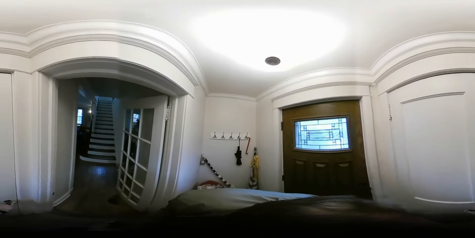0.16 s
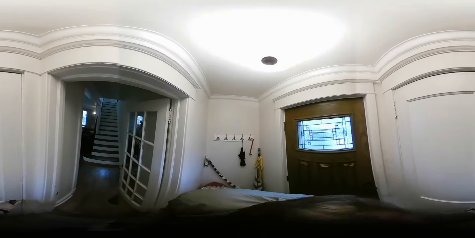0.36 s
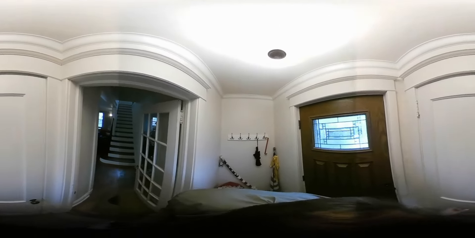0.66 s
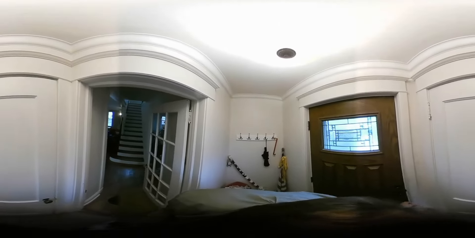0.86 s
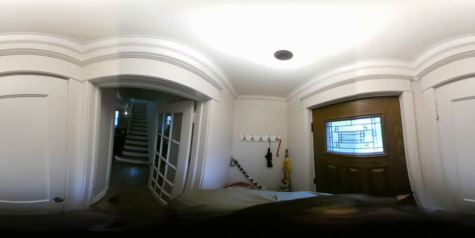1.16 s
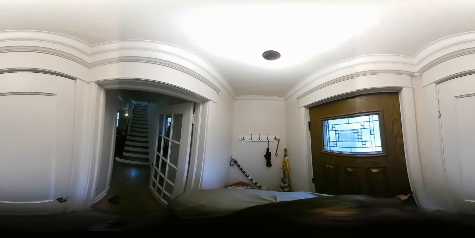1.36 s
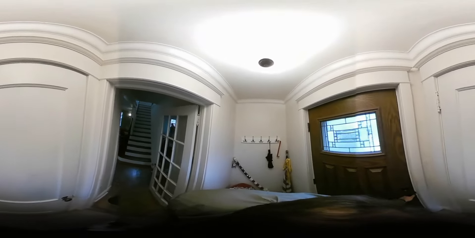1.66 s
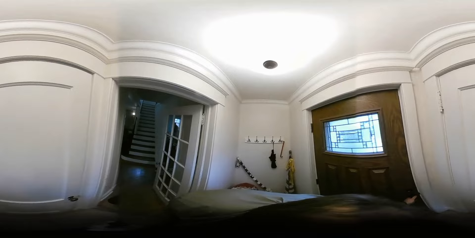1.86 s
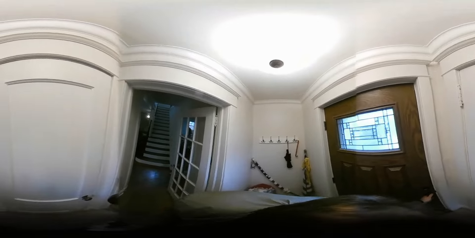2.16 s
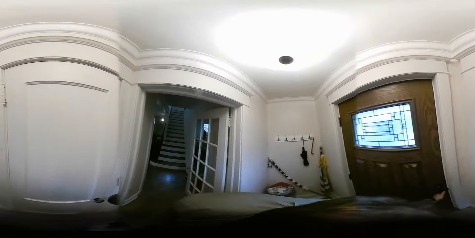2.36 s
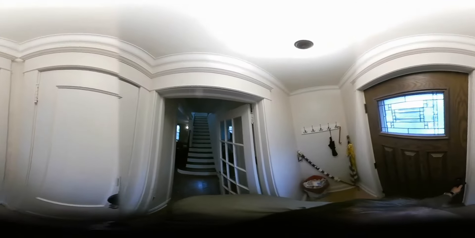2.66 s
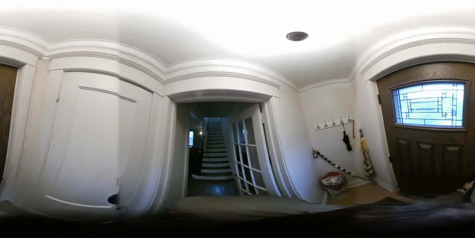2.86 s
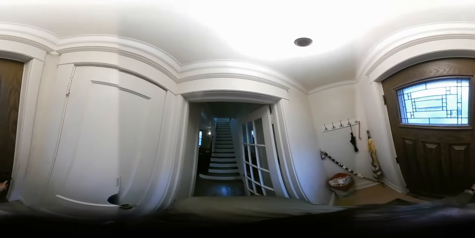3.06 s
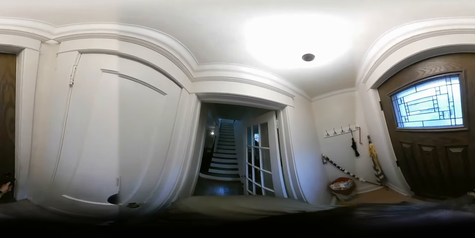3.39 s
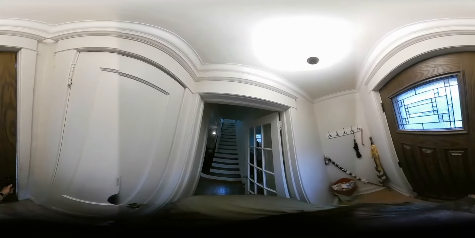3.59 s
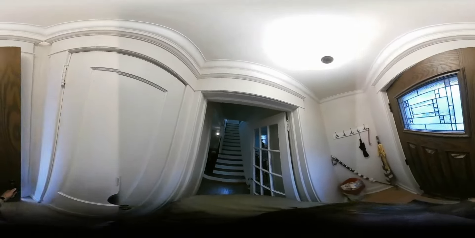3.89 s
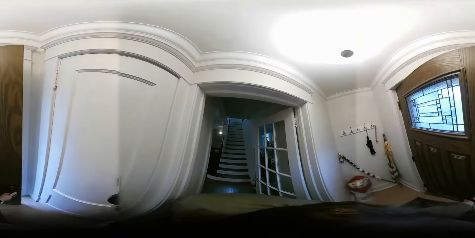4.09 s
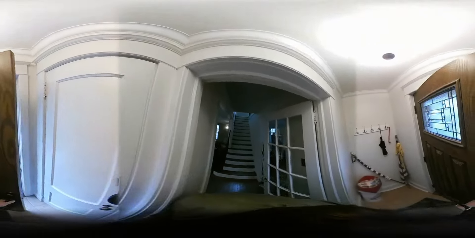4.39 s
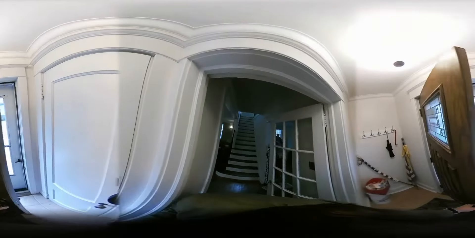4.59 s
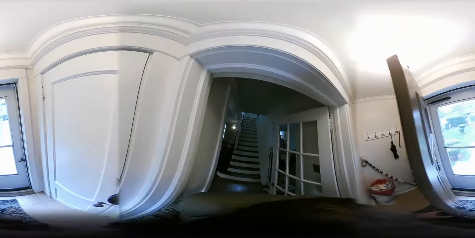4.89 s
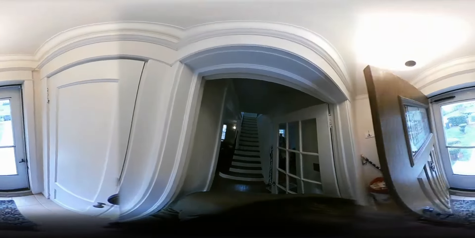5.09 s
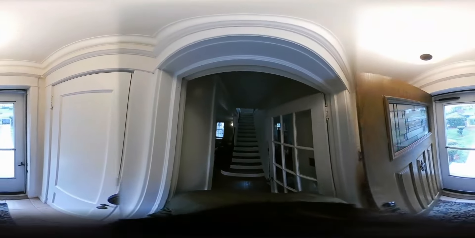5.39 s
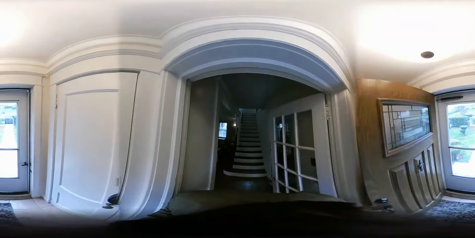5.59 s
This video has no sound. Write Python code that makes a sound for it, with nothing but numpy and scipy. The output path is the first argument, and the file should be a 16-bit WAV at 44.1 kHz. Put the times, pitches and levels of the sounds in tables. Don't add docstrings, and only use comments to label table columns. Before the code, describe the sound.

Booming inner-door slam, short rubber squeak and hollow wooden footsteps, then latch clicks and a front door jerking free of its seal with a woody groan.

```python
import sys
import numpy as np
from scipy import signal
from scipy.fft import rfft, irfft, next_fast_len
from scipy.io import wavfile
from scipy.ndimage import uniform_filter1d, map_coordinates

SR = 44100
rng = np.random.default_rng(int(sys.argv[2]) if len(sys.argv) > 2 else 0)


def master_out(mix):
    frames = np.transpose(np.atleast_2d(mix))
    ceiling = np.clip(frames, -1, 1)
    pcm = np.round(ceiling * 32767).astype(np.int16)
    wavfile.write(sys.argv[1], SR, pcm)


def voltage_ratio(level):
    return 10 ** (np.asarray(level, float) / 20)


N = 253134

# f/Hz, level/dB, time to fall 60 dB/s,
# build-up/s
SLAM_NOTES = [(48, -19, 0.46, 0.011), (74.521, -6.5, 0.6188, 0.066), (83.854, -13.5, 0.55, 0.11),
              (91, -7, 0.42, .06), (100, -10, 0.32, 0.0051), (106.3, -12.5, 0.14, 0.0051),
              (114.6, -6.5, 0.38, 0.007), (128.98, -5, 0.34, 0.0077), (135.47, -14.5, 0.37, 0.0039),
              (161.52, -20, 0.35, .003), (248.15, -23, 0.45, .01), (286.27, -18, 0.35, 0.012),
          (311.06, -12, 0.3953, .006), (368.85, -13.5, 0.3, 0.011), (463.95, -19.5, 0.29, .003),
          (516, -17, 0.28, 0.0018), (566.06, -29, 0.4, 0.003), (636.76, -28.5, .35, .003),
          (705, -25.5, 0.23, 0.0016), (787.83, -27, 0.4, 0.0024), (930.18, -31, 0.32, .003)]
# f/Hz, level per Hz/dB
CRASH = [(120, -30.5), (200, -10), (386, -9.5), (841, -16), (917, -18), (1130, -25), (4430, -42.5),
         (12500, -67.5), (16200, -99), (22000, -120)]
# f/Hz, level per Hz/dB
QUIET = [(15, -41.5), (25, -6), (123, -8), (183, -28.5), (400, -20), (507, -14), (1110, -21), (1370, -20),
         (3610, -29), (4560, -33), (7700, -37.5), (10800, -29.5), (13000, -36)]

# peak t/s, level/dB, rise per 20 dB/s, fall per 20 dB/s, crispness/dB
RUBS = [(0.029, -46, .1, 0.2863, -1.5), (0.429, -52.5, 0.073, 0.4587, -1), (1.83, -59.5, 0.01999, 0.155, 7),
        (1.97, -62, 0.0307, 0.2347, 2.5), (2.42, -67, 0.181, .5, 2), (2.539, -60.5, 0.01636, -0.8278, -14),
        (2.78, -51, 0.1445, 0.2372, 3), (2.973, -61, 0.04343, 0.2675, 0),
        (3.195, -60.5, 0.0061, 0.1491, 5.5), (3.292, -66.5, 0.0338, 0.5, -12),
        (3.424, -74.5, 0.089, 1.43, -24.5), (3.506, -58, 0.02778, .5, 7.5), (3.62, -57, 0.2258, 0.214, 1.5),
        (3.704, -52, 0.072, 0.2655, 4), (4.037, -37.5, 0.1129, 0.0675, -10),
        (4.081, -44.5, 0.10556, 0.2109, -2), (4.25, -61, 0.1638, 0.0158, -15.5),
        (4.429, -53.5, 0.1759, 0.1418, -6), (4.52, -52.5, 0.08228, 0.258, -7.5),
        (4.913, -54.5, 0.23356, .5, -4), (5.261, -63.5, 0.1344, 0.0986, -11),
        (5.45, -68, 0.659, 2.5, -30.5), (5.73, -63.5, 0.2183, -1, -1)]
# f/Hz, level per Hz/dB
RUB_BODY = [(250, -15), (350, -6), (600, 0), (900, -6.5), (1300, -8), (1800, -15)]
RUB_RUSTLE = [(590, -33.5), (1000, -4), (1090, -3.5), (2460, -2.5), (2770, -6), (6000, -18.5),
              (7800, -38.5), (13200, -120)]
RUB_FIZZ = [(2650, 4), (4500, 0), (6090, 2), (7170, -4), (8600, -6), (13000, -13)]

# t/s, peak level/dB, weight/dB, hardness/dB
SLAPS = [
    (.092, -27, 6, -11),
    (.4345, -45.5, -5.5, 1.5),
    (1.6225, -41.5, -5, -37.5),
    (1.782, -45, -2.5, -23),
    (1.808, -47, -2.5, -2),
    (1.8155, -31, -12, -8),
    (1.922, -44, -1.5, -10),
    (1.944, -37, -4, -1),
]
# t/s, peak level/dB, weight/dB, hardness/dB
STEPS = [(0.238, -39, 6, -6), (0.711, -37.5, -9, -5), (0.764, -41, -7.5, -11.5), (0.962, -56, -2, -22),
         (1.295, -43, -5.5, -10), (1.3065, -39, -13.5, -11), (1.461, -60.5, 11.5, -26),
         (1.849, -39.5, -2, -8), (2.232, -62, -15, 1), (2.401, -52.5, -2, -14.5), (2.535, -54, 2, -24),
         (2.974, -47.5, 6.5, -8.5), (3.057, -54.5, 8, -5.5)]
# t/s, peak level/dB, weight/dB, hardness/dB
LOCK = [
    (3.119, -49, -7, -1),
    (3.123, -32, 3, -12),
    (3.188, -50, 15, 1.5),
    (3.401, -55, 4.5, -16.5),
    (3.934, -37.5, 7.5, -18.5),
    (4.009, -45, 2.5, -2.5),
    (4.033, -43, -3, -13.5),
    (4.406, -53, 20.5, 1.5),
    (4.492, -39.5, -30.5, -29.5),
    (4.834, -43, -26.5, -30.5),
]
# f/Hz, width/Hz, level/dB
BOARDS = [(508.17, 24, 0), (780, 120, -27)]

# t/s, level/dB, f/Hz, time to fall 60 dB/s, build-up/s
HOLLOWS = [(.24, -35, 308, 0.2776, 0.01483), (0.782, -45.5, 208.1, 0.3296, 0.04275),
           (1.311, -37.5, 305.3, 0.14554, 0.01393), (1.456, -42.5, 309.3, 0.13134, 0.00582),
           (1.831, -36.5, 301.3, 0.4353, 0.01986), (2.533, -46, 420.3, 0.1152, 0.003924),
           (2.78, -47.5, 419.6, 0.1372, 0.00524), (3.126, -38.5, 153.4, 0.1978, 0.00631),
           (3.1263, -26, 261.1, 0.03182, 0.001068), (0.457, -48, 241.2, 0.3676, 0.023),
           (3.937, -33.5, 139.3, 0.66, 0.002455), (3.988, -29.5, 215.2, 0.37234, 0.0099),
           (4.33, -38.5, 150.2, 0.7183, 0.06554), (.79, -41, 100, 0.3233, 0.00895),
           (2.954, -48, 278.3, 0.1282, 0.00485), (5.25, -53.5, 261.4, 0.3282, 0.02067)]
# t/s, level/dB, f/Hz, time to fall 60 dB/s, build-up/s
JERKS = [
    (3.9605, -31.5, 150.2, 0.0404, 0.002146),
    (3.998, -24.5, 190, 0.0405, 0.002275),
    (4.027, -19, 520, .07, 0.008735),
    (4.024, -29, 762.2, 0.09755, 0.003085),
    (4.036, -40.5, 870.9, 0.0501, 0.003676),
    (4.05, -25, 519.3, .1, .001),
    (4.047, -27.5, 644.9, 0.0895, 0.002436),
    (4.13, -30, 38.89, 0.2963, 0.006145),
    (4.165, -47, 618, 0.2779, 0.01149),
    (4.185, -38, 305.1, 0.1338, 0.00814),
]
# t/s, peak level/dB, f/Hz, time to fall 60 dB/s, left over right/dB
TICKS = [(0.4357, -46, 4747, 0.04794, 7.5), (0.7127, -47, 6034, 0.013, 11),
         (.7124, -54.5, 8167, 0.017, 15.5), (1.8155, -48, 7521, 0.0265, 18),
         (1.8154, -42, 9822, 0.0047, 17.5), (1.82, -32, 3668, 0.02, 10), (1.9453, -37, 3064, 0.16116, 15.5),
         (1.9455, -40.5, 5381, 0.017, 14.5), (3.1225, -35, 1929, 0.018, 9), (3.2, -50, 6500, 0.06, 14),
         (3.1899, -34.5, 4984, 0.00882, 22), (3.196, -46.5, 3224, 0.045, 12),
         (3.1884, -52.5, 2352, 0.032, 10.5), (3.506, -48, 10170, 0.01478, 14.5),
         (3.554, -49, 10100, 0.015, 19), (3.935, -41.5, 1414, 0.061, 16),
         (4.0115, -39.5, 2517, 0.0387, 12.5), (4.038, -42, 2796, 0.03487, 8.5),
         (4.072, -46, 6046, 0.0624, 14.5), (1.947, -38, 1901, 0.06, 12), (1.307, -56.5, 5342, 0.16, 10.5),
         (1.316, -53.5, 3514, 0.1592, 7), (1.306, -43, 1850, .08, 7.5), (1.6248, -57, 2081, 0.0393, 3.5),
         (1.821, -47.5, 5070, 0.11, 11), (1.825, -44, 2400, 0.14, 7.5), (1.95, -46.5, 6535, 0.093, 9),
         (1.95, -44, 4293, 0.15, 8.5), (3.126, -59, 5863, 0.0788, 11), (3.192, -51.5, 8025, 0.02915, 14.5),
         (3.2, -48, 4300, .1, 12), (1.814, -44, 5500, .03, 10), (1.818, -40, 3100, .1, 8),
         (4.834, -48, 900, .05, 4), (3.935, -46, 3600, .02, 10), (4.082, -48, 8800, .04, 14),
         (3.402, -56, 800, 0.04336, 3)]

# t/s, slip rate f/Hz, level/dB
SQUEAK = [
    (.437, 1062, -56),
    (.445, 1062, -31),
    (.465, 1067, -28),
    (.477, 1069, -21.5),
    (.497, 1086, -25),
    (.507, 1098, -34),
    (.535, 1095, -36),
    (.548, 1090, -48),
    (.69, 1085, -65),
]
# t/s, slip rate f/Hz, level/dB
SKIP = [
    (0.548, 1075, -55),
    (0.559, 1060, -39),
    (0.578, 1005, -44),
    (0.6, 1010, -52),
    (0.625, 980, -62),
]
# t/s, slip rate f/Hz, level/dB
CHIRP = [
    (.565, 1350, -62),
    (.598, 1358, -45),
    (.62, 1355, -56),
    (.64, 1350, -59),
    (.69, 1370, -70),
]
# multiple of the slip rate, level/dB
SOLE = [(1, 0), (2, -19), (3, -22), (4, -34), (5, -42), (6, -43)]
# from t/s, to t/s, level/dB, rise per 20 dB/s, fall per 20 dB/s
OVERTONES = (.465, .535, -27.5, .05, .06)
# from t/s, to t/s, level/dB, rise per 20 dB/s, fall per 20 dB/s
ALTERNATE = (.492, .535, -47, .015, .09)

# peak t/s, rumble level/dB, fall per 20 dB/s, sway over rumble/dB
BUMPS = [(.45, -51, 0.1854, -2), (.77, -47, 0.0008, -16.5), (.87, -63, 0.483, 9),
         (1.35, -60.5, 0.1265, -4.5), (1.87, -47, 0.1427, -1.5), (1.95, -60.5, 0.2488, 4),
         (2.44, -57.5, 0.2839, -10.5), (2.56, -69, 0.0503, -7), (2.851, -57, 0.0951, -6.5),
         (2.97, -56.5, 0.2899, 0), (3.14, -50, 0.1502, -7), (3.64, -47, 0.3045, -0.5),
         (3.72, -46, 0.2077, -7.5), (3.83, -49, 0.0329, -0.5), (3.961, -54.5, 0.1901, -16.5),
         (4.0, -39.5, 0.1814, -3), (4.121, -39.5, 0.2171, -4.5), (4.4, -50.5, 0.1947, 4.5),
         (4.55, -52, 0.1259, -1), (4.91, -55, 0.4043, -5), (5.12, -59.5, 0.7837, -4.5),
         (5.62, -64.5, 0.4861, -6.5)]
# f/Hz, level per Hz/dB
SWAY = [(12, -7.5), (25, 7), (55, -1.5), (80, -34)]
RUMBLE = [(50, -16), (80, 3.5), (130, 2.5), (200, -5.5), (320, -5.5), (420, -21.5)]
# t/s, f/Hz, level/dB
WHISTLE = [
    (3.66, 8210, -73),
    (3.696, 8350, -57.5),
    (3.708, 8300, -44.5),
    (3.792, 8070, -70.5),
    (3.8, 8018, -73),
]

# f/Hz, likeness (1 = the same)
ALIKE = [(25, .985), (60, 0.998), (130, 0.995), (280, 0.93), (590, 0.64), (1270, 0.15), (2730, -0.06),
         (12600, -0.01)]
# f/Hz, share of the left-right level difference
SHADOW = [(500, 0.5), (1200, 0.5381), (3800, 1), (12000, 3)]
# f/Hz, time to fall 60 dB/s
HALL = [(150, 0.44), (600, 0.35031), (2500, 0.33953), (10000, 0.023)]


def unit(x):
    return x / np.sqrt(np.mean(x ** 2) + 1e-20)


def along(points, hz):
    f, value = np.transpose(points)
    return np.interp(np.log(hz + 1), np.log(f + 1), value)


def curves(rows):
    seconds, *columns = np.transpose(rows)
    t = np.arange(N) / SR
    gate = np.clip(np.minimum(t - seconds[0], seconds[-1] - t) / .02 + .5, 0, 1)
    return [np.interp(t, seconds, column) for column in columns] + [gate]


def swell(start_s, end_s, db, rise_s, fall_s):
    t = np.arange(N) / SR
    before = (start_s - t) / np.abs(rise_s)
    after = (t - end_s) / np.abs(fall_s)
    return db - 20 * np.maximum(0, np.maximum(before, after))


def wobble(rate, size=N):
    knots = rng.standard_normal(int(size * rate / SR) + 4)
    return map_coordinates(knots, [np.arange(size) * rate / SR])


def filtered(x, response):
    m = next_fast_len(x.shape[-1] + 8192)
    return irfft(rfft(x, m) * response(np.fft.rfftfreq(m, 1 / SR)), m)[..., :x.shape[-1]]


def panned(db):
    return voltage_ratio(np.array([db / 2, -db / 2]))


def spaced(pair, gain, pan_db):
    lead_s = .0001
    size = pair.shape[1]
    m = next_fast_len(size + 4096)
    hz = np.fft.rfftfreq(m, 1 / SR)
    turn = np.arccos(np.clip(along(ALIKE, hz), -1, 1)) / 2
    mid, side = rfft(pair, m) * gain(hz) * [np.cos(turn), np.sin(turn)]
    shading = panned(pan_db * along(SHADOW, hz))
    lead = np.exp(1j * np.pi * lead_s * np.outer([1, -1], hz))
    return irfft(np.array([mid + side, mid - side]) * shading * lead, m)[:, :size]


def patchy(seconds, patch_db, t60=np.inf):
    noise = rng.standard_normal((2, int(seconds * SR) + 1))
    hz, t, z = signal.stft(noise, SR, nperseg=256)
    patches = uniform_filter1d(rng.standard_normal(z.shape[1:]), size=4, axis=0)
    patches = unit(uniform_filter1d(patches, size=9, axis=1))
    fading_db = -60 * t / (t60 * along(HALL, hz))[:, None]
    out = signal.istft(z * voltage_ratio(patch_db * patches + fading_db), SR, nperseg=256)[1]
    return out[:, :int(seconds * SR)]


def dying(seconds, stretch):
    return patchy(seconds, 2.2, stretch)


def rush(spectrum, grain_db, rate, patch_db, pan_db=0):
    if patch_db:
        pair = patchy(N / SR + .01, patch_db)[:, :N]
    else:
        pair = rng.standard_normal((2, N))
    points = [(7.3, -120)] + list(spectrum) + [(SR / 2, -120)]
    grains = voltage_ratio(grain_db * wobble(rate))
    return unit(spaced(pair * grains, lambda hz: voltage_ratio(along(points, hz)), pan_db))


def ring(t, hz, db, t60, rise_s):
    return voltage_ratio(db - 60 * t / t60) * (1 - np.exp(-t / rise_s)), 2 * np.pi * hz * t


def slam():
    t = np.arange(SR) / SR
    panels = np.zeros((2, SR))
    for hz, db, t60, rise_s in SLAM_NOTES:
        size, turns = ring(t, hz, db, t60, rise_s)
        scatter = 2 * np.pi * rng.random() * (hz > 200)
        quarter_turn = np.pi / 2 * rng.choice([-1, 1]) * np.array([[0], [1]])
        panels -= size * np.sin(turns + scatter + quarter_turn)
    crash = spaced(dying(1, stretch=1.1), lambda hz: voltage_ratio(along(CRASH, hz)), pan_db=8.0)
    crash *= voltage_ratio(-20.5) / np.std(crash[:, :SR // 20])
    both = (spaced(panels, np.ones_like, 0) + crash) * np.clip(t / .002, 0, 1)
    return np.pad(both, ((0, 0), (0, N - SR)))


def quiet_house():
    return voltage_ratio(-65.5) * rush(QUIET, 0.85, 11, 0, pan_db=3)


def rubbing():
    body = rush(RUB_BODY, 1.6, 65, 0.79)
    rustle = rush(RUB_RUSTLE, 0.66, 250, 3.0)
    fizz = rush(RUB_FIZZ, 0.5, 400, 2.9)
    strokes = voltage_ratio([swell(s, s, db, rise_s, fall_s) for s, db, rise_s, fall_s, _ in RUBS])
    crisp_db = np.array(RUBS)[:, -1]
    treble = voltage_ratio(crisp_db - 3.5) @ strokes * rustle
    treble += voltage_ratio(-6.5 + 1.5682 * crisp_db) @ strokes * fizz
    return strokes.sum(axis=0) * body + panned(9.5)[:, None] * treble


def knocks(events, stretch, rise_s, crack, boards, pan_db):
    out, t = np.zeros((2, N + SR)), np.arange(SR // 3) / SR

    def wood(f):
        modes = sum(voltage_ratio(db) * f * width / (hz * hz - f * f + 1j * f * width) for hz, width, db in BOARDS)
        return 1 + boards * np.abs(modes)

    for s, db, low_db, bright_db in events:
        top_db = bright_db - 12
        shape = [(70, low_db - 16.5), (260, low_db + 0.5), (820, 0.0037),
                 (2700, bright_db - 3), (7700, top_db - 6), (13000, top_db - 30)]
        burst = dying(1 / 3, stretch) * (1 - np.exp(-t / rise_s))
        burst += crack * voltage_ratio(-60 * t / 0.025) * rng.standard_normal((2, len(t)))
        burst *= voltage_ratio(1.8 * wobble(600, len(t)))
        burst = spaced(burst, lambda hz: voltage_ratio(along(shape, hz)) * wood(hz), pan_db)
        burst *= np.clip(t / .0012, 0, 1)
        out[:, round(s * SR):][:, :len(t)] += 3.6542 * voltage_ratio(db) * burst
    return out[:, :N]


def hollow_notes(events):
    out, t = np.zeros((2, N + SR)), np.arange(SR // 2) / SR
    for s, db, hz, t60, rise_s in events:
        size, turns = ring(t, hz, db, t60, rise_s)
        waver = 1 + 0.2913 * wobble(38.276, len(t))
        out[:, round(s * SR):][:, :len(t)] += size * waver * np.sin(turns)
    return out[:, :N]


def metal_snaps():
    out, t = np.zeros((2, N + SR)), np.arange(SR // 2)[:SR // 6] / SR
    for s, db, hz, t60, pan_db in TICKS:
        size, turns = ring(t, hz, db, t60, .0004)
        drift = np.cumsum(rng.standard_normal((2, len(t))), axis=1) * .2
        out[:, round(s * SR):][:, :len(t)] += size * np.sin(turns + drift) * panned(pan_db)[:, None]
    return out[:, :N]


def slips(rows, jitter, rough, waver, bright_db, alternate_db):
    hz, db, gate = [curve[:SR] for curve in curves(rows)]
    turns = 2 * np.pi * np.cumsum(hz * (1 + jitter * wobble(90, SR))) / SR

    def shaky(k):
        size = 1 + rough * np.sqrt(k) * wobble(139.7, SR)
        return size * np.sin(k * turns + rough * k * wobble(119.7, SR))

    tone = (1 + waver * wobble(70.084, SR)) * np.sin(turns)
    whole = sum(voltage_ratio(level + bright_db) * shaky(k) for k, level in SOLE[1:])
    halves = sum(voltage_ratio(alternate_db - 4.5 * k - 14 * (k < 1)) * shaky(k + .5) for k in range(7))
    return np.sqrt(2) * voltage_ratio(db) * gate * (tone + whole + halves)


def squeak():
    _, tone_db, _ = curves(SQUEAK)
    bright_db = swell(*OVERTONES) - tone_db
    alternate_db = swell(*ALTERNATE) - tone_db
    rubber = slips(SQUEAK, .0015, .3, .05, bright_db[:SR], alternate_db[:SR])
    rubber += slips(SKIP, .006, .4, .5, -3, -40)
    rubber += slips(CHIRP, .009, .4, .6, -3, -40)
    scrape_shape = [(400, -37), (900, 16.0), (3500, -3.5), (6500, -9.5), (10000, -31.5)]
    scrape = filtered(rng.standard_normal(SR), lambda hz: voltage_ratio(along(scrape_shape, hz)))
    rubber += voltage_ratio(-36) * np.abs(rubber) ** 0.68 * unit(scrape)
    tail = dying(0.63, stretch=1.0)
    hall = signal.fftconvolve(rubber[None], tail / np.linalg.norm(tail[0]), axes=1)[:, :SR]
    wall = np.roll(rubber, round(.022 * SR)) * voltage_ratio([[-18], [-5]])
    both = rubber * voltage_ratio([[4.5], [-12]]) + wall + voltage_ratio(-16) * hall
    return np.pad(both, ((0, 0), (0, N - SR)))


def bumps():
    rise, sway_lag_s, at_rest_db = 0.6334, 0.03098, -72
    pushes = voltage_ratio([swell(s, s, db, rise * fall_s, fall_s) for s, db, fall_s, _ in BUMPS])
    sway = np.roll(voltage_ratio(np.array(BUMPS)[:, -1]) @ pushes, round(sway_lag_s * SR)) + voltage_ratio(at_rest_db - 2.5)
    rumble = pushes.sum(axis=0) + voltage_ratio(at_rest_db)
    return sway * rush(SWAY, 1.1, 21, 0) + rumble * rush(RUMBLE, 2.1, 30, 0)


def handle_whistle():
    hz, db, gate = curves(WHISTLE)
    tone = np.sqrt(2) * np.sin(2 * np.pi * np.cumsum(hz) / SR)
    return voltage_ratio(db) * gate * unit(wobble(1100)) * tone * voltage_ratio([[5], [-12]])


def standing_waves(x, depth_db, spacing_hz):
    peaks = rng.standard_normal(2000)

    def response(hz):
        depth = depth_db * np.clip(hz / 400 - .5, 0, 1)
        return voltage_ratio(depth * map_coordinates(peaks, [hz / spacing_hz], mode="wrap"))

    return filtered(x, response)


def scene():
    air = quiet_house() + rubbing() + bumps()
    air = standing_waves(air, depth_db=1.5, spacing_hz=30.022)
    slaps = knocks(SLAPS, stretch=0.70154, rise_s=0.0069, crack=1.01, boards=0.19, pan_db=7.5)
    steps = knocks(STEPS, stretch=0.7634, rise_s=0.00655, crack=0.8198, boards=0.82, pan_db=6.0)
    lock = knocks(LOCK, stretch=0.63994, rise_s=0.007492, crack=1.0, boards=0.364, pan_db=7.5)
    wood = hollow_notes(HOLLOWS + JERKS)
    return slam() + air + slaps + steps + wood + metal_snaps() + squeak() + lock + handle_whistle()


def roll_off(x):
    return signal.sosfilt(signal.butter(12, 13170, fs=SR, output="sos"), x)


def record(dry):
    held = dry / (1 + np.abs(dry / .98) ** 6) ** (1 / 6)
    mix = filtered(held, lambda hz: hz < 13100)
    return roll_off(mix)


dry = scene()
out = record(dry)
master_out(out)
```